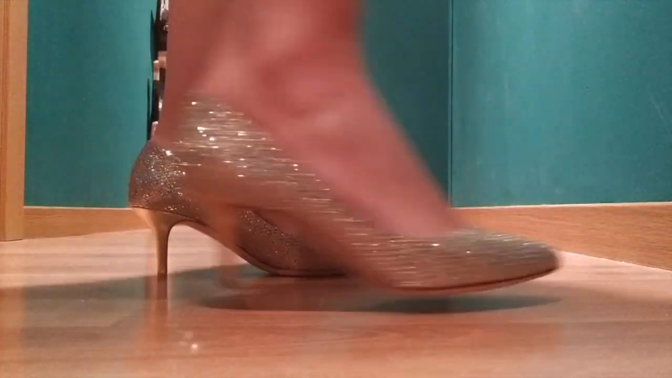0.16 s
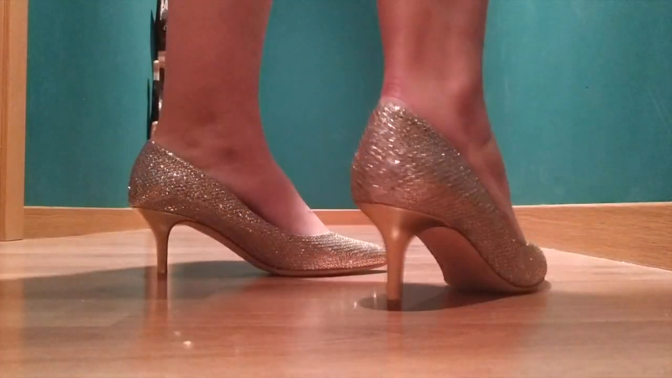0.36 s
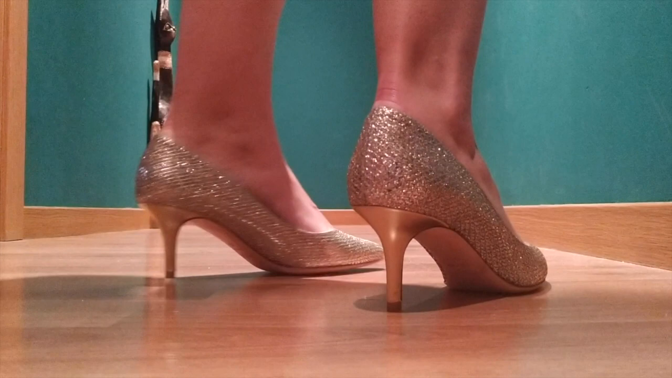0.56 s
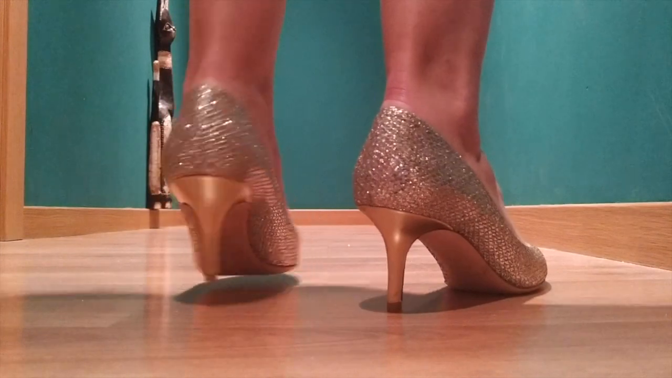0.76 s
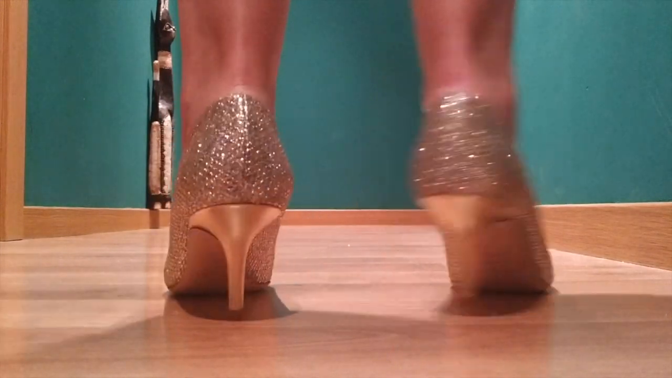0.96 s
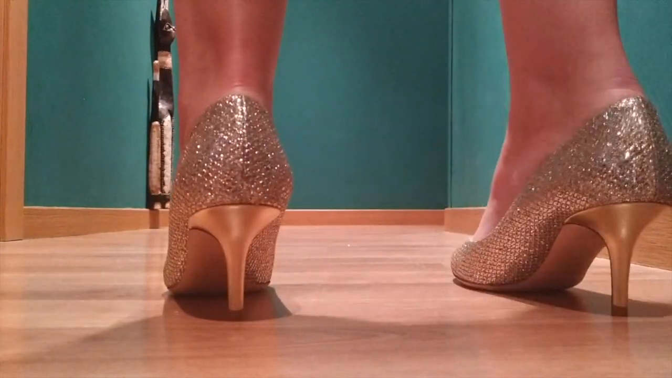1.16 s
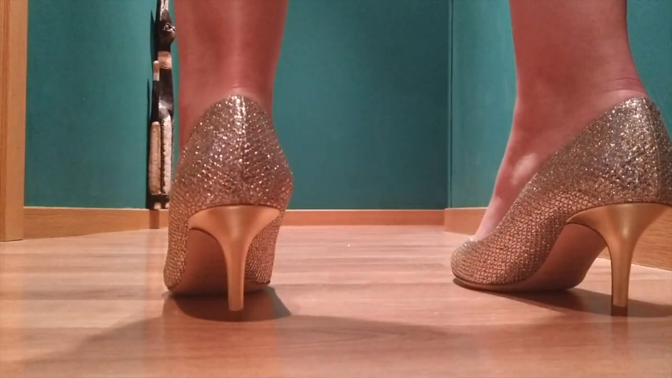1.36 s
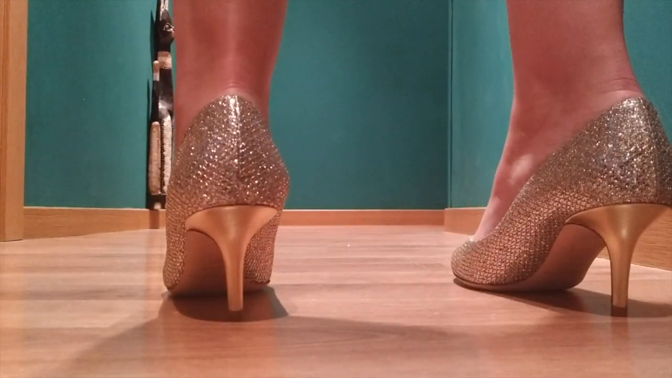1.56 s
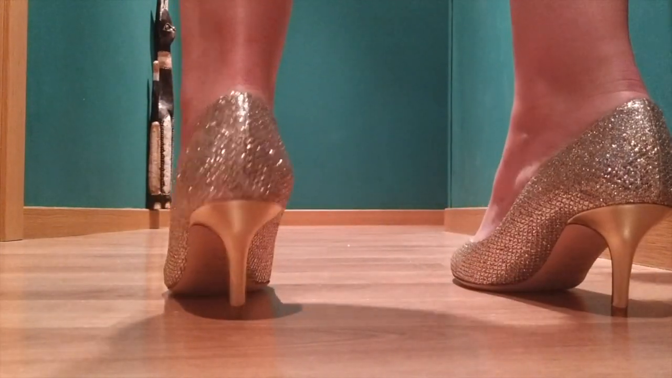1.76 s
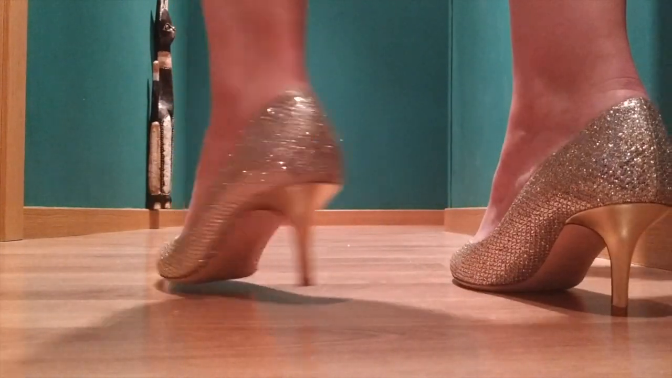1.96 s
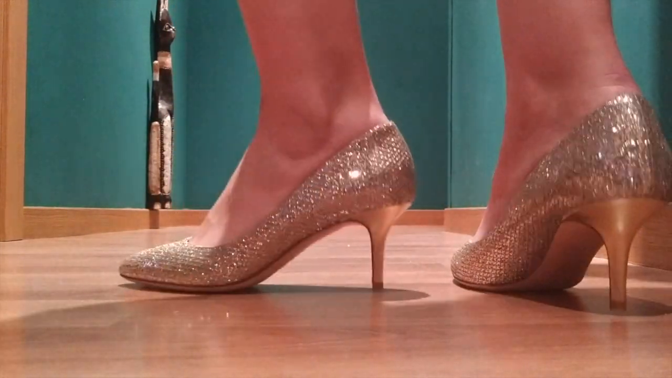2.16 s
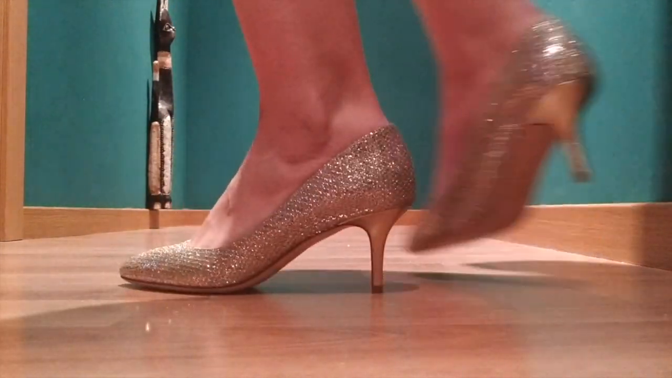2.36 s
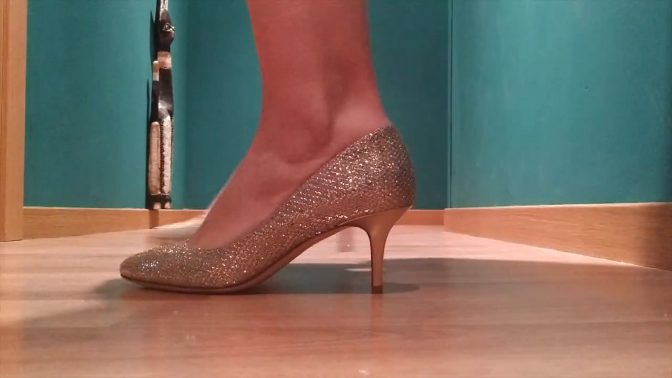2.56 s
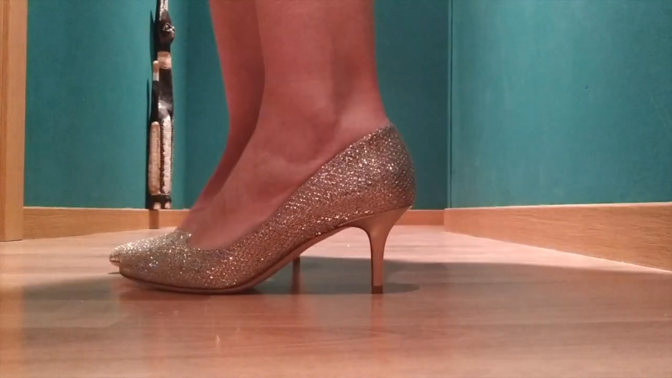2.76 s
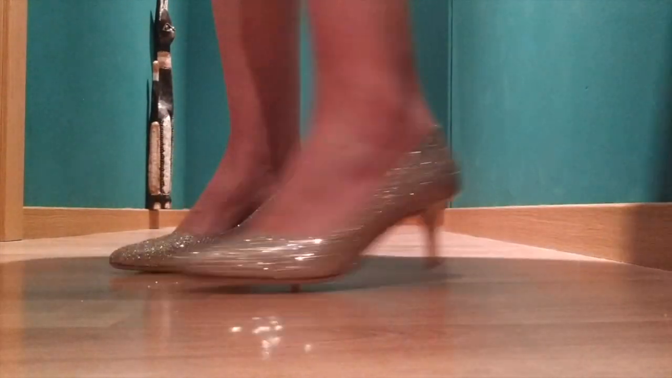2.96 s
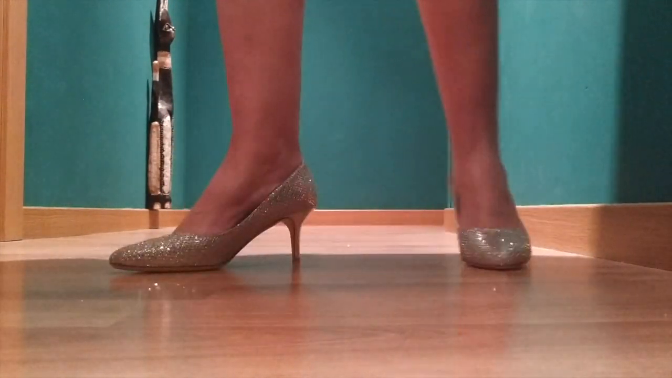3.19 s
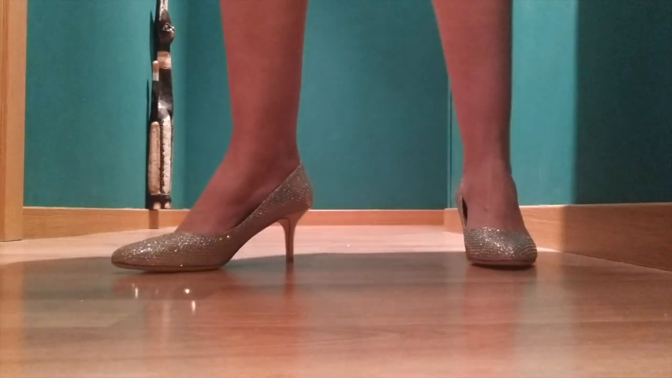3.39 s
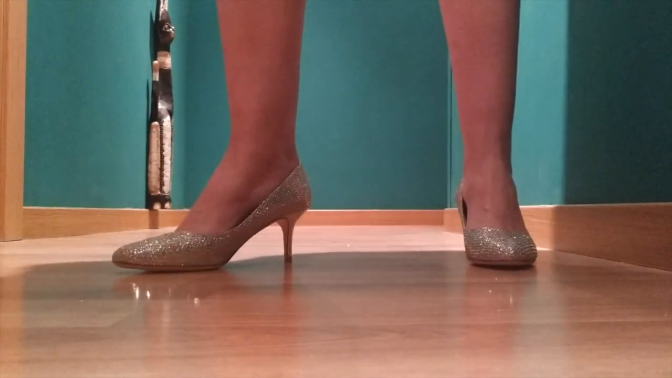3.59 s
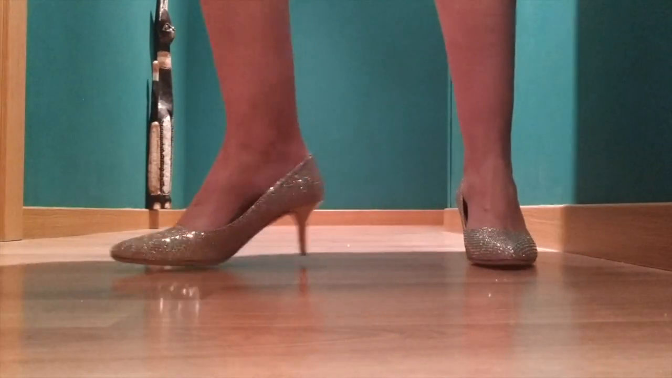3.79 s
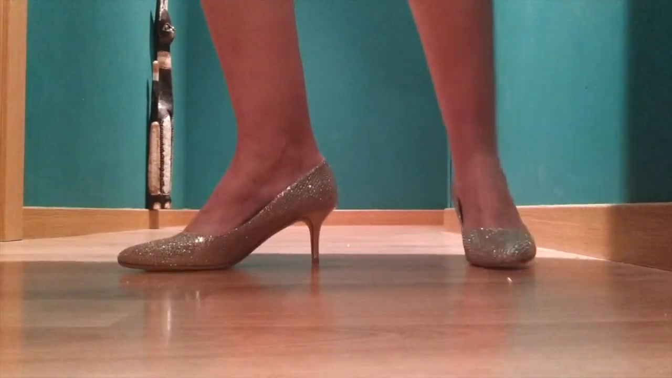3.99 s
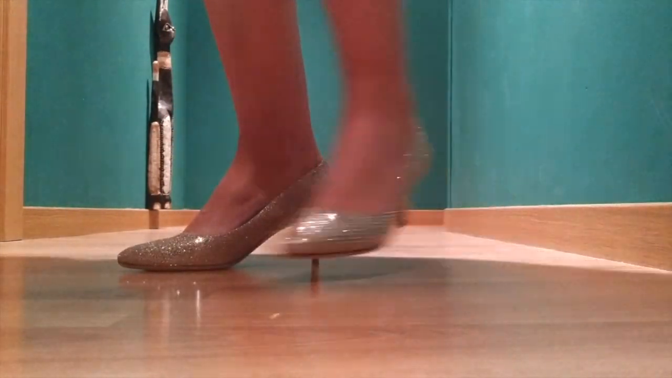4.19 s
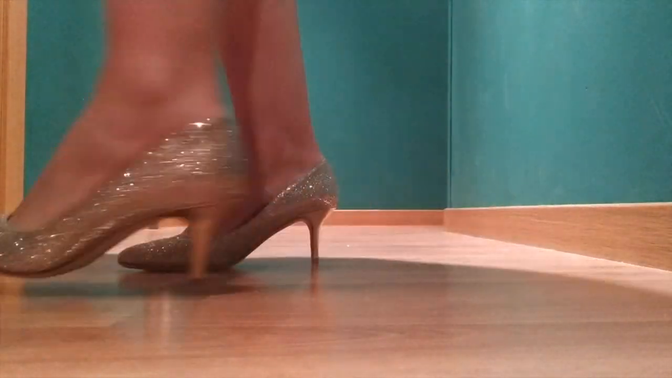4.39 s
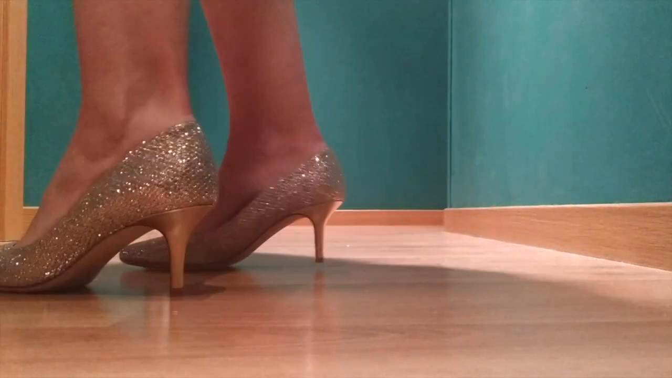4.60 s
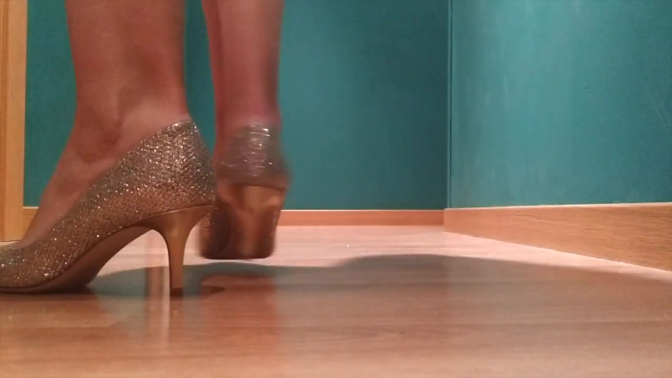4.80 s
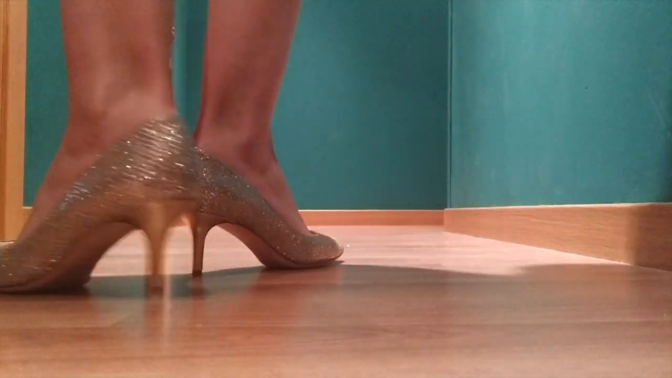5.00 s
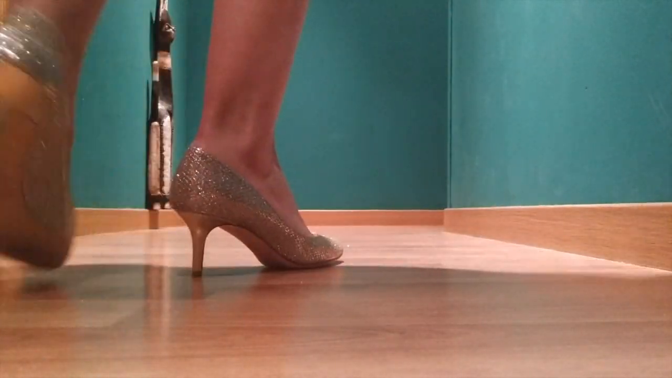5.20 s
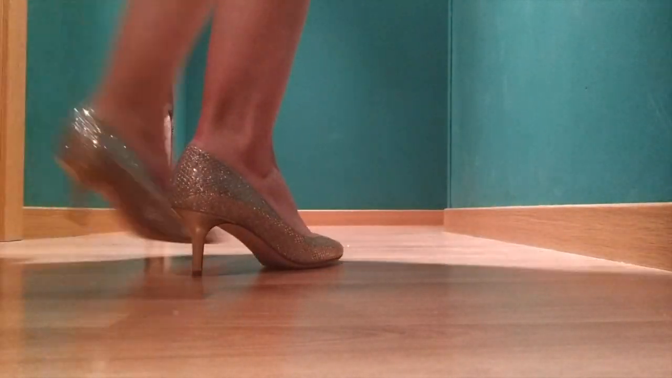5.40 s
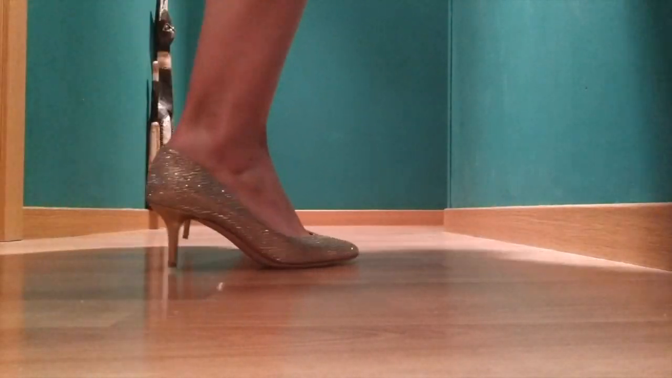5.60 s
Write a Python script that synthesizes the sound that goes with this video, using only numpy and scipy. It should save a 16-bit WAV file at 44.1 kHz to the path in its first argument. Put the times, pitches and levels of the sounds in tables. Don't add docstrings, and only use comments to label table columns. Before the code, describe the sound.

Stiletto heels step and pivot unevenly on a laminate floor in a small hallway, with sharp knocks, bright scuffs and gritty cracks close to the microphone.

```python
import sys
import numpy as np
from scipy import signal
from scipy.io import wavfile

SR = 44100
rng = np.random.default_rng(int(sys.argv[2]) if len(sys.argv) > 2 else 0)


def boost_factor(decibels):
    exponent = np.asarray(decibels, float) / 20
    return 10 ** exponent


def pcm_store(signal):
    levels = np.round(np.clip(np.atleast_2d(signal), -1, 1) * 32767)
    wavfile.write(sys.argv[1], SR, levels.astype(np.int16).T)


N = 249165

LAG_CRACK_S = 0.00043


def in_time(rows):
    s, *columns = np.transpose(rows)
    return [np.interp(np.arange(N) / SR, s, column) for column in columns]


def at_hz(points, hz):
    table = np.array(points)
    return np.interp(np.log(hz), np.log(table[:, 0]), table[:, 1])


def rms_one(x):
    return x / np.sqrt(np.mean(x ** 2) + 1e-20)


def band(x, low_hz, high_hz):
    return signal.sosfilt(signal.butter(2, [low_hz, high_hz], "band", fs=SR, output="sos"), x)


def late(x, lag_s):
    n = np.arange(len(x))
    return np.interp(n - lag_s * SR, n, x, left=0)


def stereo_bands(size, likeness, gain):
    out = 0
    edges = 40 * 2 ** np.arange(0, 9, .5)
    white = rng.standard_normal((2, 2, size))
    for k, (low, high) in enumerate(zip(edges, edges[1:])):
        mid, side = band(white[k % 2], low, high)
        hz = np.sqrt(low * high)
        alike = np.clip(at_hz(likeness, hz), -1, 1)
        pair = np.sqrt(1 + alike) * mid + np.sqrt(1 - alike) * side * [[1], [-1]]
        out = out + gain(hz) * pair
    return out


# (t/s, level/dB)
RUMBLE = [(0.0, -57), (0.66, -58.5), (0.69, -55), (1.3, -53.5), (1.43, -45.5), (1.72, -63), (1.98, -55.5),
          (2.57, -59.5), (2.72, -54), (2.99, -58), (4.66, -59.5), (4.78, -64), (4.94, -53.5), (5.65, -63.5)]
# (f/Hz, density/dB per Hz)
HISS = [(40, -10), (60, -10), (130, -11.5), (260, -13.5), (420, -19), (900, -23), (2200, -26),
        (4500, -25.5), (9000, -33), (14000, -21)]
# (f/Hz, left-right likeness/1)
HISS_LIKENESS = [(60, 0.072), (240, 0.78), (950, -0.049), (3770, 0.03), (15000, -0.01)]


def background():
    hiss = rms_one(stereo_bands(N, HISS_LIKENESS, lambda hz: boost_factor(at_hz(HISS, hz))))
    settled = band(rng.standard_normal((3, N + SR)), 7.8, 34.7)[:, SR:]
    common, left, right = settled
    rumble = rms_one(common + 0.4 * np.array([left, right]))
    return boost_factor(-63) * hiss + boost_factor(in_time(RUMBLE)[0]) * rumble


# (f/Hz, left-right likeness/1)
HALL_LIKENESS = [(80, 0.9), (300, 1), (700, 0.55), (1400, 0.019), (14000, 0.051)]


def earlier_step():
    level_db, t60_s = -62, 1
    decay = boost_factor(level_db - 60 * np.arange(N) / SR / t60_s)
    field = stereo_bands(N, HALL_LIKENESS, lambda hz: float(200 < hz < 900))
    return decay * rms_one(band(field, 250, 850))


# (delay t/s, level/dB)
ECHOES = [
    (.0045, -11),
    (0.011, -24),
    (0.021, -14),
]
# (f/Hz, T60/s)
HALL_T60 = [(80, 0.46), (210, 0.44), (560, 0.4), (1470, 0.37), (3880, 0.28), (10200, 0.33)]
# (f/Hz, level/dB)
HALL_LEVEL = [(60, -35), (120, -45), (300, -34.5), (800, -35.5), (2000, -36), (5000, -26.5), (12000, -32.5)]
# (f/Hz, t/s)
HALL_SWELL = [(300, 0.0026), (1500, 0.00534), (5000, 0.012)]


def hallway():
    t = np.arange(SR * 3 // 5) / SR

    def envelope(hz):
        swell = 1 - np.exp(-(t / at_hz(HALL_SWELL, hz)) ** 2)
        return swell * boost_factor(at_hz(HALL_LEVEL, hz) - 60 * t / at_hz(HALL_T60, hz))

    tail = stereo_bands(len(t), HALL_LIKENESS, envelope)
    slaps = np.zeros(len(t))
    for delay_s, echo_db in ECHOES:
        wander = 1 + .05 * rng.standard_normal()
        slaps[round(delay_s * wander * SR)] = boost_factor(echo_db)
    return tail + band(slaps, 59, 1420)


# (t/s, hallway share level/dB, left-right level/dB)
WALK = [(0, -25, 0), (.6, 10, 12), (.9, -3.5, -8.5), (1.2, -3.5, -2.5), (2.1, -3.5, -9.5), (2.7, 0.5, 0),
        (2.9, 0, 2), (3.2, 1.5, 0.5), (3.9, 1, -0.5), (4.5, -2.5, -1), (4.8, 0, 2.5), (4.95, 0.5, 2),
        (5.65, 3, 1)]


def standing(s):
    times, hall_db, pan_db = np.transpose(WALK)
    return np.interp(s, times, hall_db), np.interp(s, times, pan_db)


def add(tracks, s, left, right, send):
    i = round(s * SR)
    spot = 1 + int(s * 2) % (len(tracks) - 1)
    tracks[0, :, i:i + len(left)] += np.array([left, right])[:, :N - i]
    tracks[spot, :, i:i + len(send)] += send[:N - i]


# (start t/s, rise t/s, hold t/s, hiss level/dB, dull part level/dB)
SLIDES = [(0.02, 0.058, 0.14, -57.5, -6), (0.333, .04, 0.15, -53, -4.5), (0.497, 0.02, 0.22, -49, -14.5),
          (.845, 0.019, 0.24, -38.5, -9), (1.673, 0.088, 0.47, -53.5, -15.5),
          (2.06, 0.019, 0.053, -49, -11.5), (2.176, 0.075, 0.0075, -40.5, -17),
          (2.695, 0.012, 0.065, -52.5, -6), (2.764, 0.083, 0.013, -44.5, -8.5),
          (2.933, .05, 0.061, -62, -23), (3.146, 0.01, 0.046, -39, -12), (3.225, 0.07, 0.01, -47, -16),
          (3.335, 0.042, 0.0074, -47, -9.5), (3.643, 0.071, 0.015, -52.5, -14),
          (3.82, 0.12, 0.068, -53, -8), (4.431, 0.037, 0.25, -45.5, -11), (4.923, 0.026, .16, -39.5, -14.5),
          (5.465, 0.037, .2, -44, -15)]


def slides():
    rise_db, sag_db_per_s, release_db_per_s = 31.5, 45, 203
    rustle_db, rustle_dull_db = -73, -4
    t = np.arange(N) / SR
    bright, dull = boost_factor(rustle_db), boost_factor(rustle_db + rustle_dull_db)
    for s, rise_s, hold_s, hiss_db, dull_db in SLIDES:
        since = t - s - rise_s
        fall_db = sag_db_per_s * since + release_db_per_s * np.maximum(since - hold_s, 0)
        gain = boost_factor(hiss_db - np.where(since < 0, -rise_db * since / rise_s, fall_db))
        bright, dull = bright + gain, dull + boost_factor(dull_db) * gain
    return bright, dull


def scuffs(tracks):
    grains_per_s = 14000
    bright_gain, dull_gain = slides()
    sizes = boost_factor(2.0 * np.minimum(rng.exponential(1, (3, N)), 5))
    struck = rng.random((3, N)) < grains_per_s / SR
    both, a, b = rng.standard_normal((3, N)) * sizes * struck
    catch = boost_factor(2.6 * rms_one(band(rng.standard_normal(N), 25, 140)))
    grains = catch * np.array([late(0.4 * both, LAG_CRACK_S) + a, 0.32 * both + b])
    bright = rms_one(band(grains, 8200, 22000))
    dull = rms_one(band(grains, 1600, 5140))
    left, right = boost_factor(-5.0) * bright_gain * bright - boost_factor(-1.5) * dull_gain * dull
    add(tracks, 0, left, right, boost_factor(-7.5) * right)


def crack_colour(x, dull_db, low_hz):
    dull_octaves = 0.93
    bright = band(x, 6000, 13140)
    dull_filter = signal.butter(1, [low_hz, low_hz * 2 ** dull_octaves], "band", fs=SR)
    return boost_factor(-5.0) * bright - boost_factor(dull_db + 6.5) * signal.lfilter(*dull_filter, x)


# (t/s, peak level/dB, dull part level/dB, hallway level/dB)
SNAPS = [(0.0848, -34, -51, 13), (0.3756, -15.5, -10, -12.5), (.401, -35, -24, -7), (0.922, -32, -17, -2),
         (0.9387, -36.5, -11, 9.5), (1.153, -44, -23.5, -11), (1.583, -48, -25.5, -10),
         (2.229, -42, -17, 6), (2.4538, -63.5, 7.5, 2), (2.7149, -52, 9.5, -20), (2.978, -52, -16, -8),
         (3.207, -35.5, -11.5, -25), (3.296, -32, -20, -28), (3.4074, -59, -15, -7),
         (3.7144, -50.5, -21, -6), (3.7507, -46, -15, -14), (4.614, -16.5, -8, -2.5), (4.627, -26, -22, -7),
         (4.6335, -31.5, -4, -12), (4.8716, -48.5, -29, 0), (5.0477, -33.5, -43, -16),
         (5.3183, -46.5, -25.5, -1.5), (5.4857, -48.5, -20, 3), (5.6401, -25.5, -18, 3)]
# (t/s, peak level/dB, dull part level/dB)
TICKS = [(0.515, -49, -25), (.857, -48.5, 10.5), (1.1637, -48.5, 10.5), (2.0772, -43.5, 3), (2.138, -55, 7),
         (2.5984, -57, 0), (2.6974, -52, 17.5), (2.752, -45.5, 9), (2.7814, -54, -7), (2.823, -42, -15),
         (3.152, -41, -5), (3.3083, -45, 5.5), (3.8362, -30.5, 2.5), (3.847, -50, -7), (4.463, -55, 8.5),
         (4.476, -39.5, -1.5), (4.5923, -58, 15), (4.942, -56, 14.5), (5.5784, -40, 10), (5.59, -51, 14)]


def cracks(tracks):
    size = 1024
    snap_s, snap_s_per_db, snap_low_hz = .0031, .00006, 2800
    tick_s, tick_hall_db, tick_low_hz = 0.0038, -3.5, 1700
    snaps = [(*row, snap_s + snap_s_per_db * (row[1] + 40), snap_low_hz) for row in SNAPS]
    ticks = [(*row, tick_hall_db, tick_s, tick_low_hz) for row in TICKS]
    every = sorted(snaps + ticks)
    grit = rng.standard_normal((len(every), 3, size))
    click = np.eye(1, size)[0] * np.sqrt(size)
    for (s, peak_db, dull_db, hall_db, length_s, low_hz), (both, a, b) in zip(every, grit):
        far_db, pan_db = standing(s)
        rise_s = length_s / 3
        t = np.arange(size) / SR / rise_s
        shape = boost_factor(peak_db + 2.5) * (t * np.exp(1 - t)) ** 2
        left = late(shape * crack_colour(both + a, dull_db, low_hz), LAG_CRACK_S)
        right = shape * crack_colour(both + b, dull_db, low_hz)
        send = np.sqrt(np.mean(shape ** 2)) * crack_colour(click, dull_db, low_hz)
        add(tracks, s - rise_s, boost_factor(pan_db / 2) * left, boost_factor(-pan_db / 2) * right, boost_factor(hall_db + far_db) * send)


def mode(hz, t60, size):
    t = np.arange(size) / SR
    return np.sin(2 * np.pi * hz * t) * boost_factor(-60 * t / t60)


# (t/s, dip level/dB, boom level/dB, body level/dB, knock level/dB)
LANDINGS = [(.3586, -17.5, 5, 40, -31), (.8563, -17.5, -.5, -12, -39), (.9553, -15, -2, -5.5, -34),
            (1.1635, -9, -24, -5, -1), (2.0766, -21, 1, -5.5, -16), (2.1928, -28.5, -5.5, 0, -18.5),
            (2.698, -19.5, -9, -1, 9), (2.752, -14.5, 0, -2, 4.5), (2.8827, -23.5, -13, 9.5, -23),
            (3.1492, -25.5, -5, 9, -29), (3.3076, -18.5, -8.5, -3, -31), (3.8353, -19.5, 12.5, 9.5, 15.5),
            (3.9146, -21.5, -3.5, 0.5, -9.5), (4.4623, -18.5, 8, 29, -22), (4.9371, -24, 15.5, 14.5, -19),
            (5.5786, -15.5, 11.5, 12.5, 14.5)]
# (t/s, dip level/dB, boom level/dB, body level/dB, knock level/dB)
REBOUNDS = [(0.3713, -19.5, -4.5, -25, -2), (.867, -33, 12.5, -14, -13), (1.1666, -18, 1.5, 4.5, -3),
            (2.0882, -27.5, -18, -3, -25), (2.1379, -36, -8.5, -6, -11), (2.7085, -21, -5, -6, -29),
            (2.7624, -23.5, 8, -13, -18), (2.7784, -20.5, -28, 9, -23), (2.8217, -22, -12, 4.5, 15),
            (3.3191, -32, 1, -7, 20), (3.8459, -20, 4.5, -9, -9), (4.4765, -12, 7.5, 14.5, -18),
            (4.9422, -21, -21, 2, 1), (4.9544, -24.5, -15, -7, -27), (5.588, -26, 4, -7, -27)]
# (t/s, dip level/dB, weight level/dB, knock level/dB)
TOUCHES = [(0.519, -41, -7, -1), (1.7452, -46, 8.5, -18), (1.9397, -57, -8, -5), (2.466, -56, 25, .5),
           (2.5977, -45.5, -3, 42), (3.6707, -44.5, -14, 28), (5.5024, -50, 3, -21)]


def thuds(tracks):
    boom, body, tap = (156, -10, .08), (412, -0.64, 0.0063), (705, -.5, 0.0098)   # (f/Hz, level/dB, T60/s)
    knock, clack = (1132, -11.5, .012), (2000, -5, 0.0067)
    pitch_spread, contact_s = .07, 0.0007
    touch_body_db = -9.5
    lag_s = 0.00021
    touches = [(s, db, weight, weight + touch_body_db, k) for s, db, weight, k in TOUCHES]
    blows = sorted(LANDINGS + REBOUNDS + touches)
    size = SR // 5
    chance = rng.standard_normal((len(blows), 5))
    contact = np.hanning(round(contact_s * SR))
    for (s, dip_db, boom_db, body_db, knock_db), luck in zip(blows, chance):
        hall_db = standing(s)[0]
        weights = (boom_db, body_db, 0, knock_db, knock_db)
        blow = np.zeros(size)
        for (hz, db, t60), weight_db, u in zip((boom, body, tap, knock, clack), weights, luck):
            blow += boost_factor(db + weight_db) * mode(hz * (1 + pitch_spread * u), t60, size)
        blow = np.convolve(blow, contact)[:size]
        blow = band(band(blow, 119.6, 5110), 85.5, 9030)
        dip = np.argmax(blow[:SR // 500])
        blow = -boost_factor(dip_db + 0.33) * blow / blow[dip]
        left = boost_factor(-4.0) * late(blow, lag_s)
        add(tracks, s - dip / SR - lag_s / 2, left, blow, boost_factor(hall_db + 0.77) * blow)


def scene():
    tracks = np.zeros((4, 2, N))
    thuds(tracks)
    cracks(tracks)
    scuffs(tracks)
    walls = sum(signal.fftconvolve(send, hallway(), axes=1)[:, :N] for send in tracks[1:])
    return tracks[0] + walls + earlier_step() + background()


# (f/Hz, width f/Hz, lift level/dB)
PORTS = [
    (8640, 820, 8.5),
    (8267, 556, 14),
]


def ports(x):
    out = []
    for channel, (hz, width_hz, lift_db) in zip(x, PORTS):
        r = np.exp(-np.pi * width_hz / SR)
        w = 2 * np.pi * hz / SR
        feed = (1 - r * r) / 2 * np.array([1, 0, -1])
        cavity = signal.lfilter(feed, [1, -2 * r * np.cos(w), r * r], channel)
        out.append(channel + boost_factor(lift_db) * cavity)
    return out


def roll_off(x):
    return signal.sosfilt(signal.butter(12, 15610, fs=SR, output="sos"), x)


def record(dry):
    right_dull_hz, cutoff_hz = 11550, 14500
    left, right = ports(dry)
    right = signal.sosfilt(signal.butter(2, right_dull_hz, fs=SR, output="sos"), right)
    steep = signal.cheby2(14, 34, cutoff_hz, fs=SR, output="sos")
    mix = signal.sosfilt(steep, [left, right])
    return roll_off(mix)


dry = scene()
out = record(dry)
pcm_store(out)
```